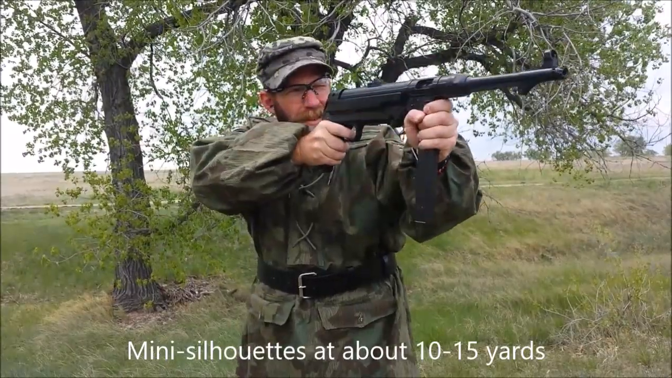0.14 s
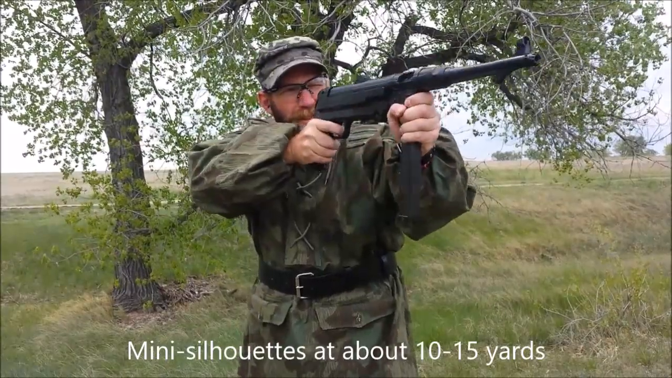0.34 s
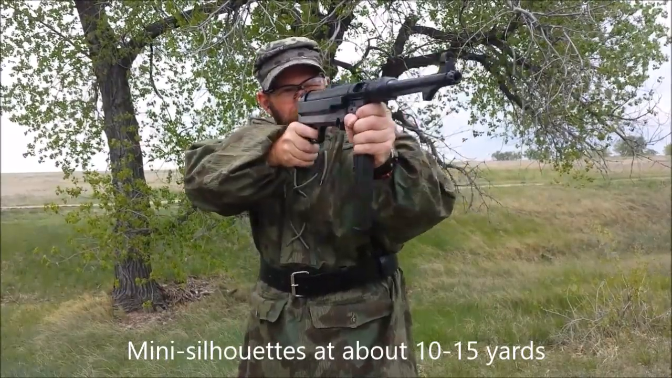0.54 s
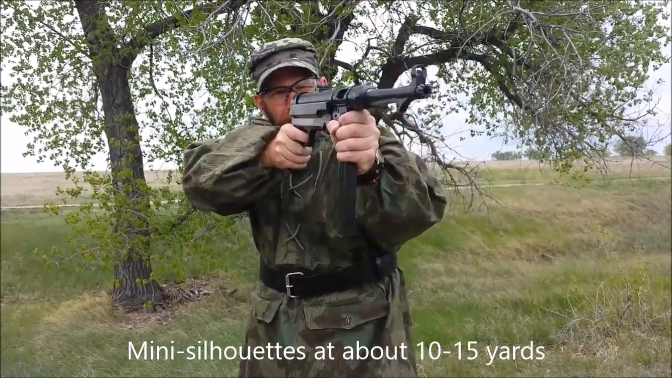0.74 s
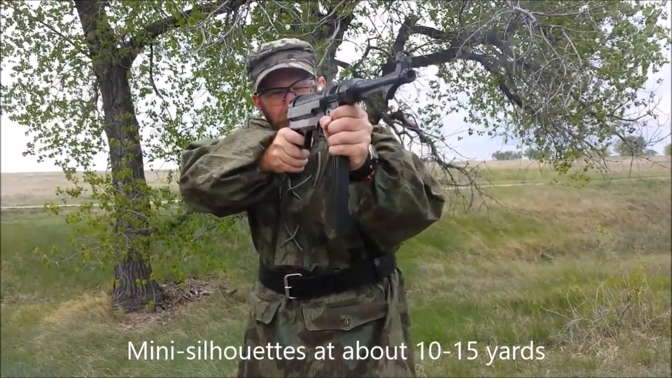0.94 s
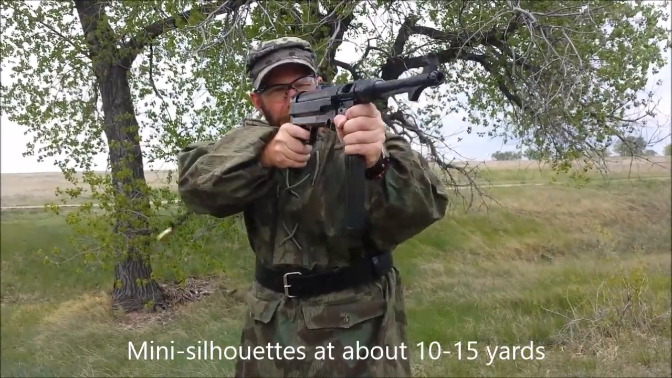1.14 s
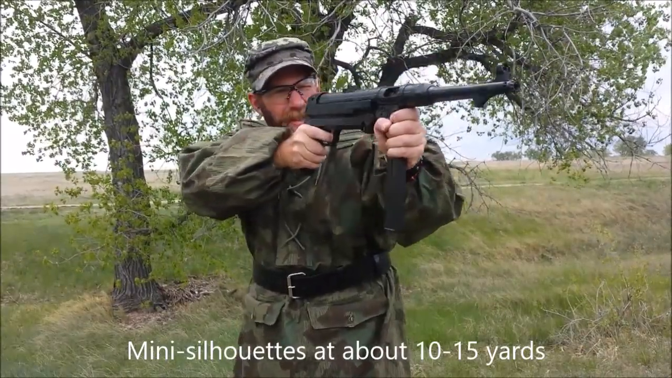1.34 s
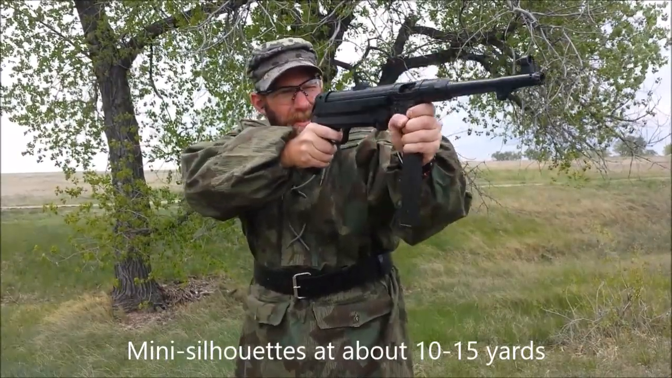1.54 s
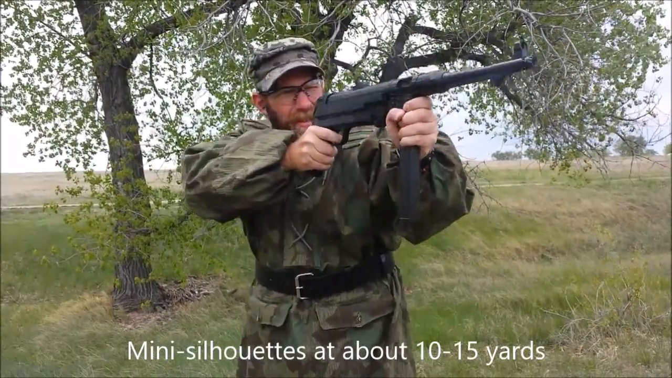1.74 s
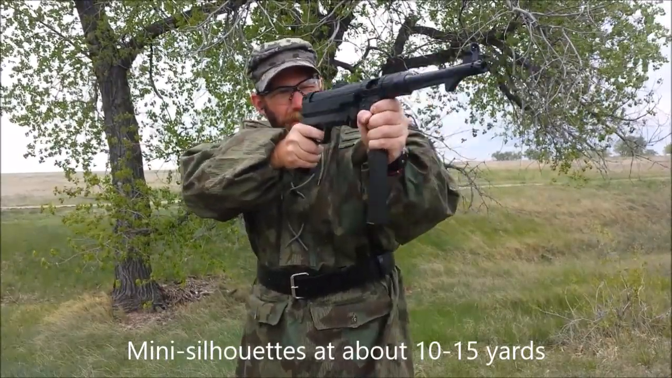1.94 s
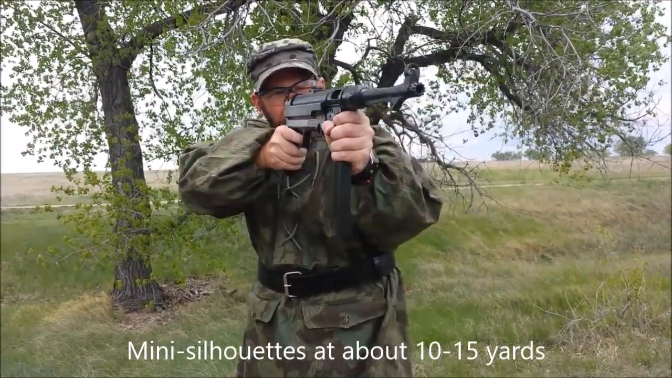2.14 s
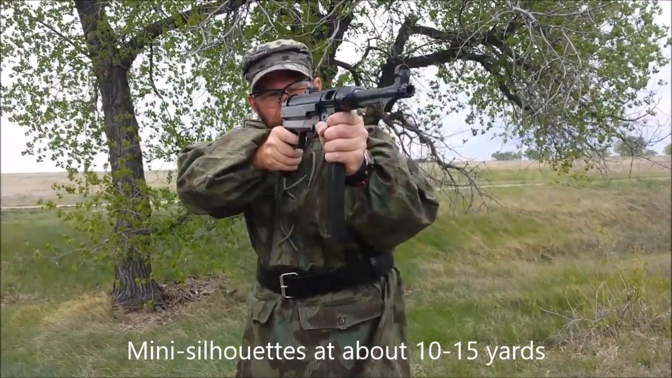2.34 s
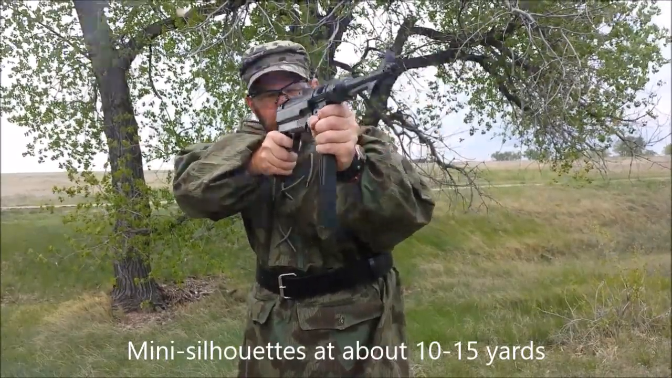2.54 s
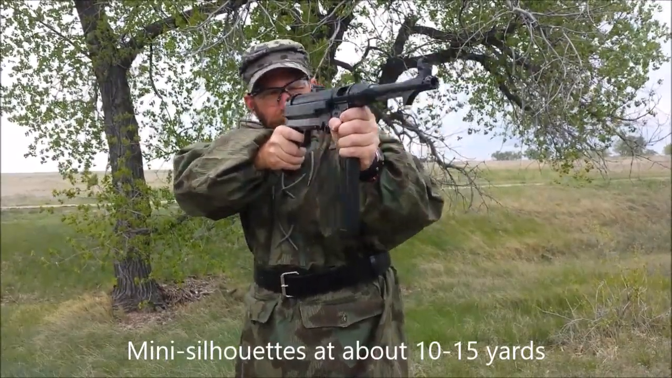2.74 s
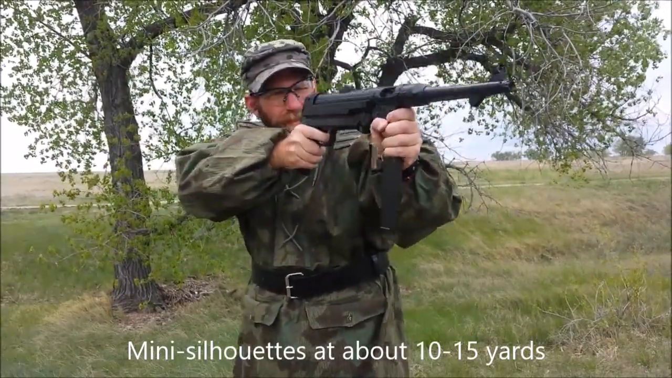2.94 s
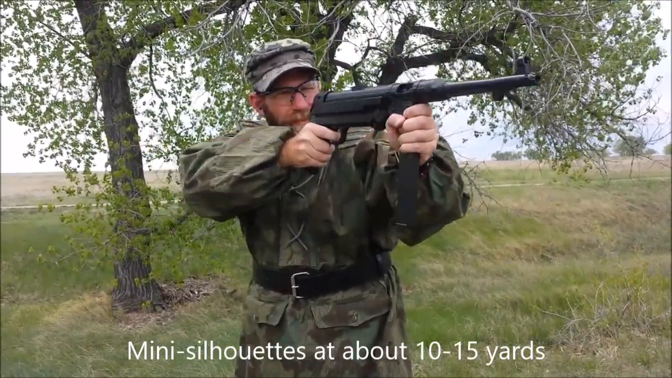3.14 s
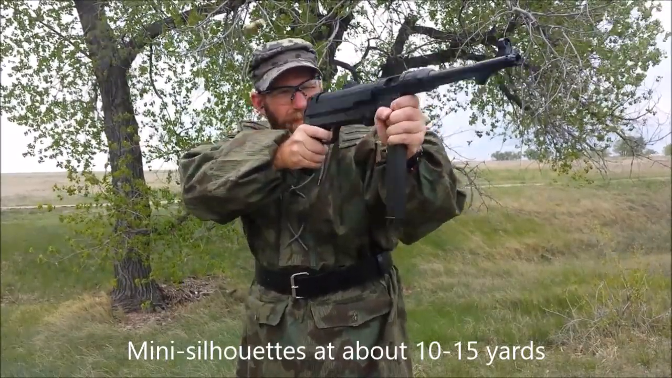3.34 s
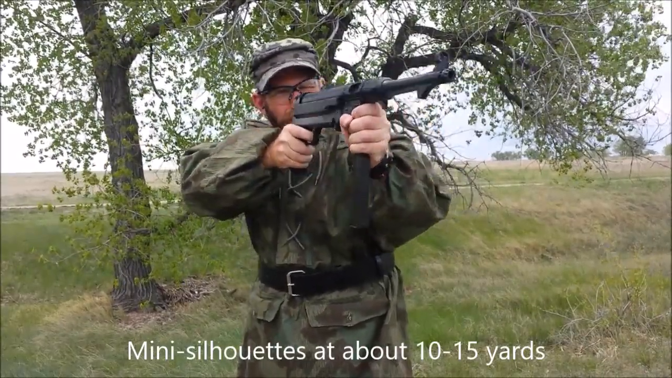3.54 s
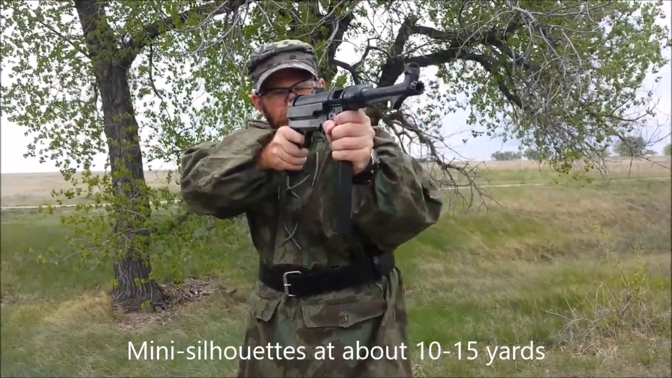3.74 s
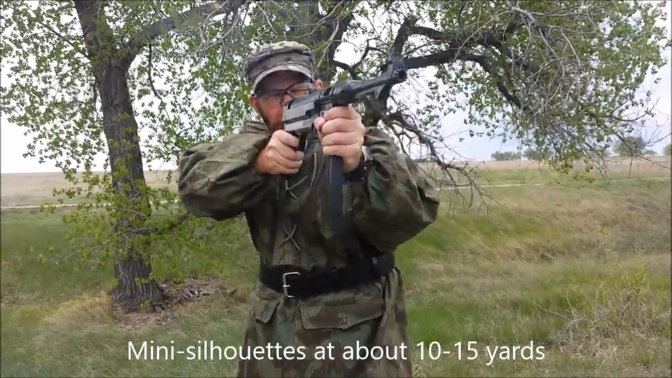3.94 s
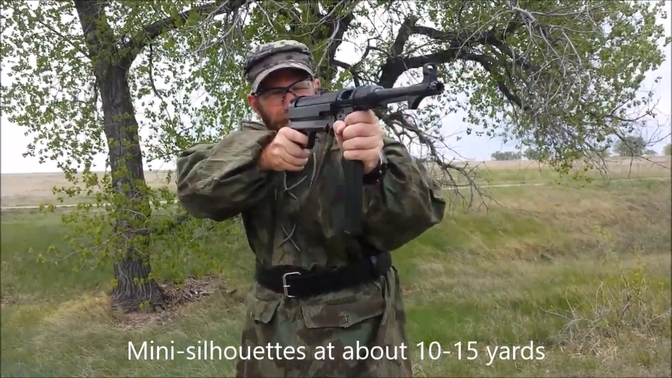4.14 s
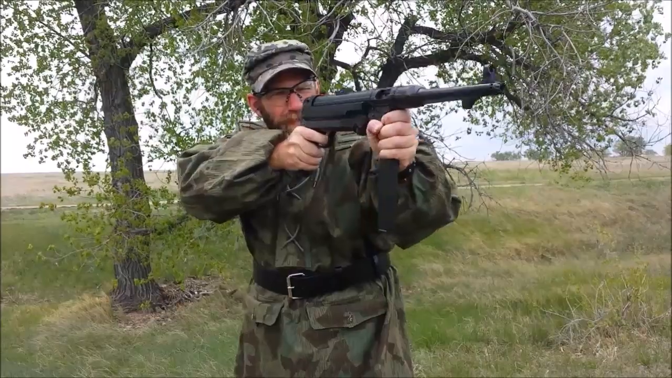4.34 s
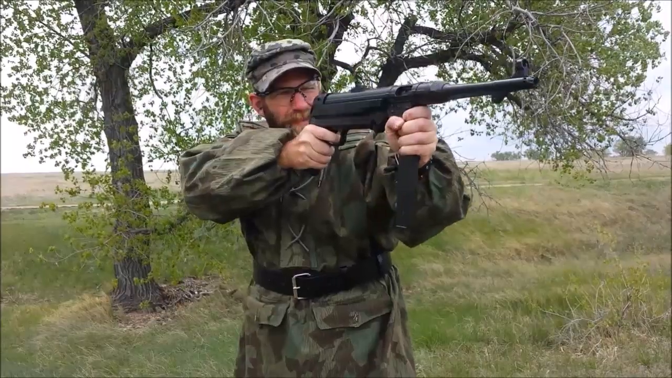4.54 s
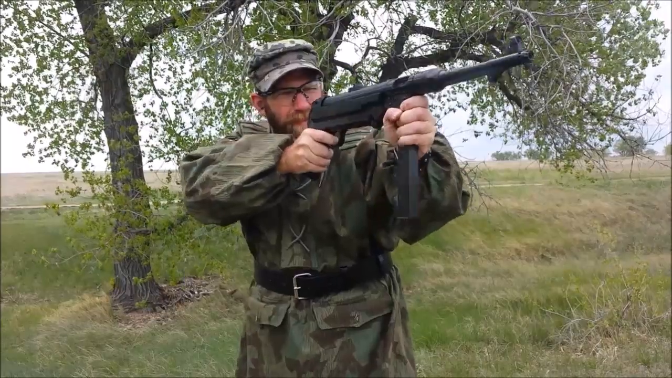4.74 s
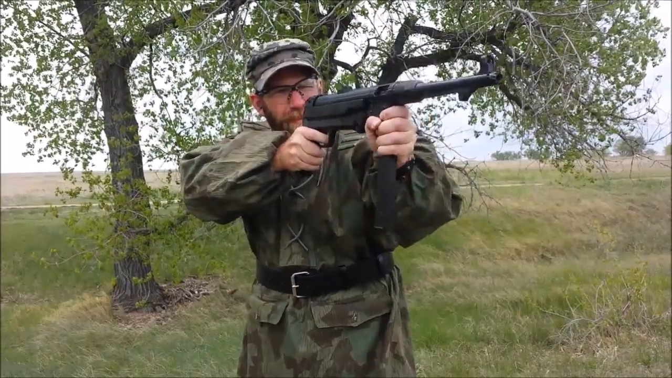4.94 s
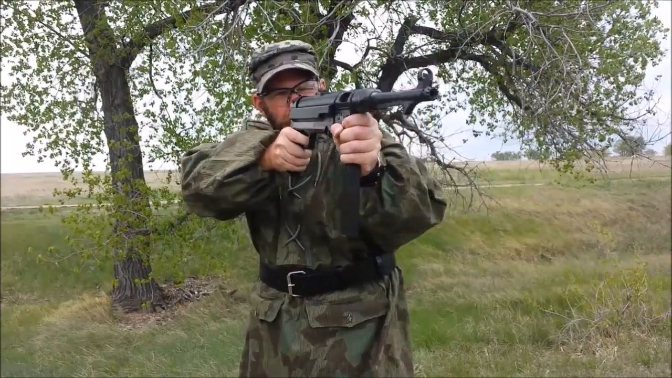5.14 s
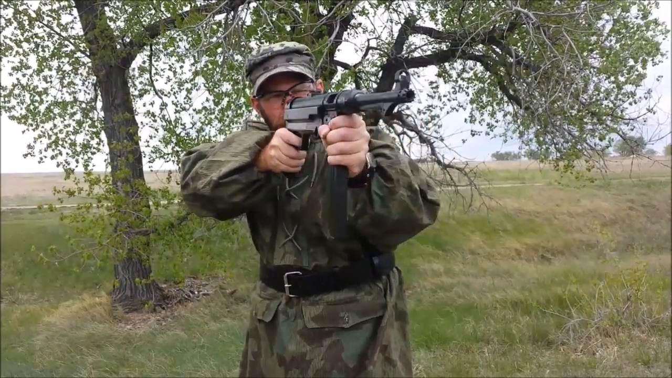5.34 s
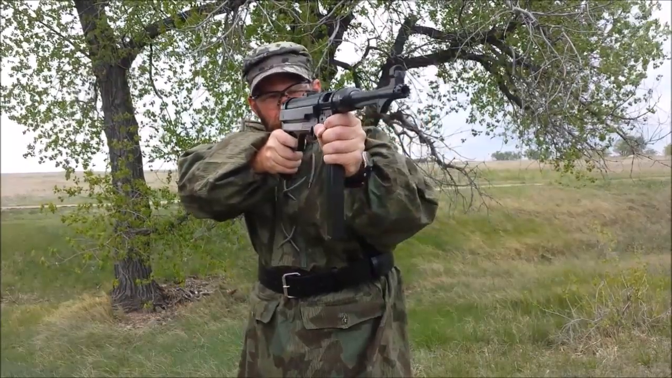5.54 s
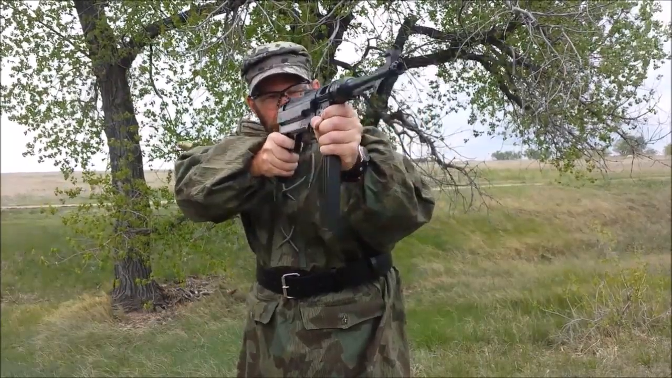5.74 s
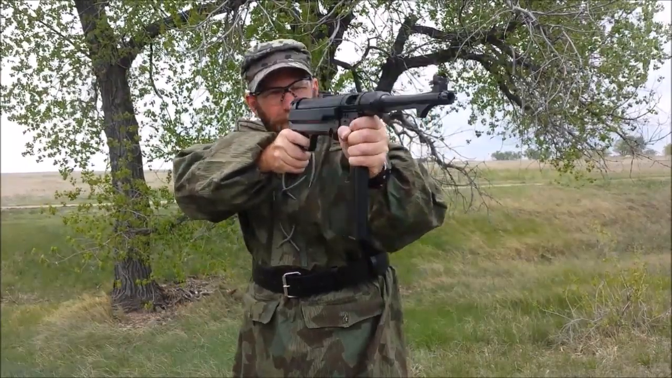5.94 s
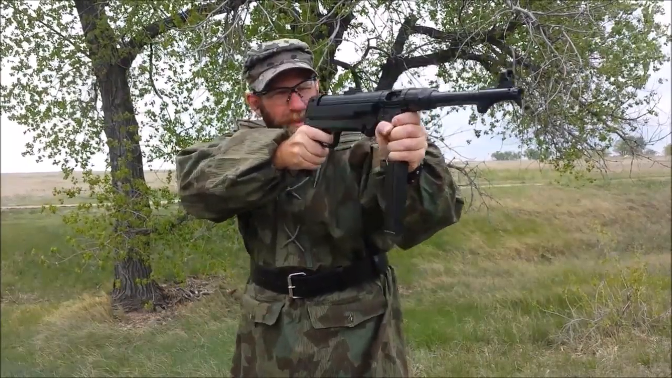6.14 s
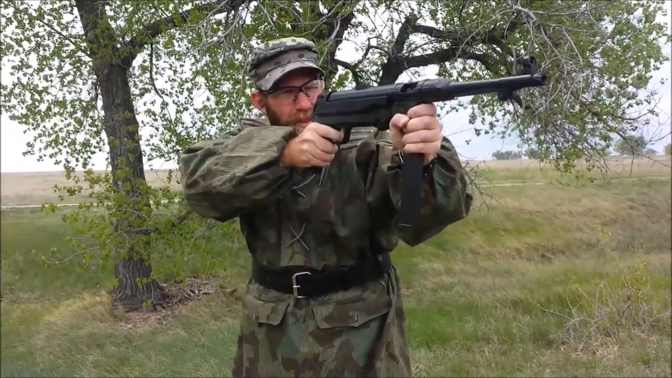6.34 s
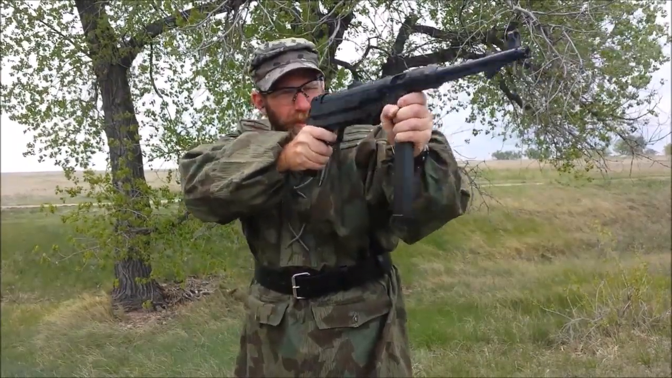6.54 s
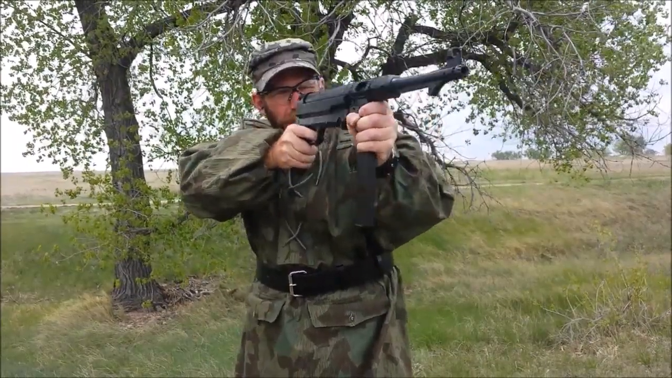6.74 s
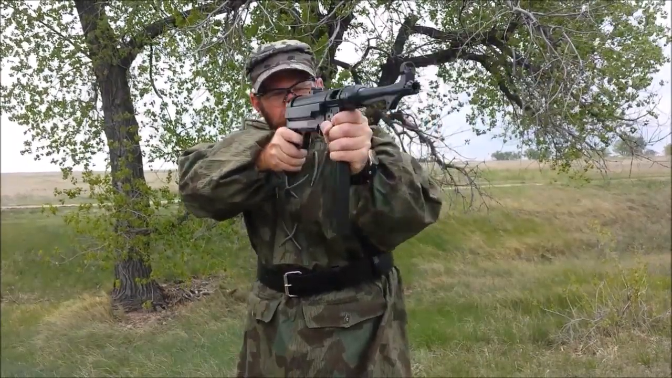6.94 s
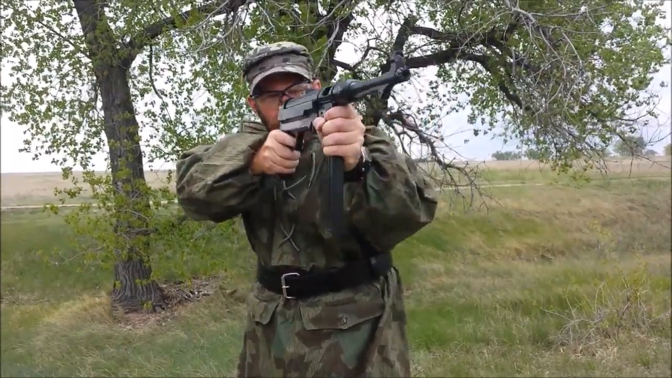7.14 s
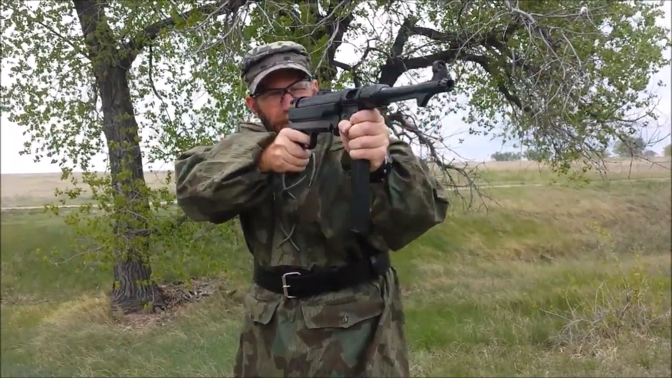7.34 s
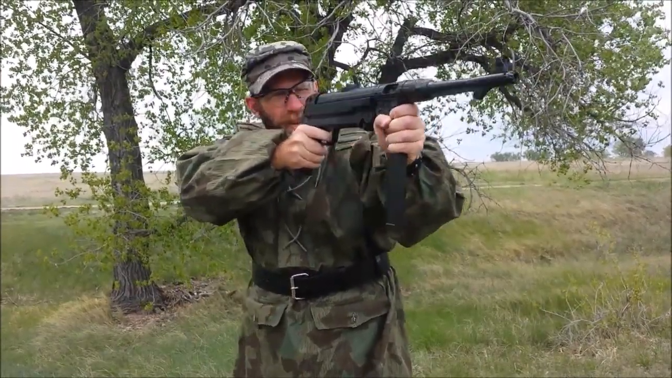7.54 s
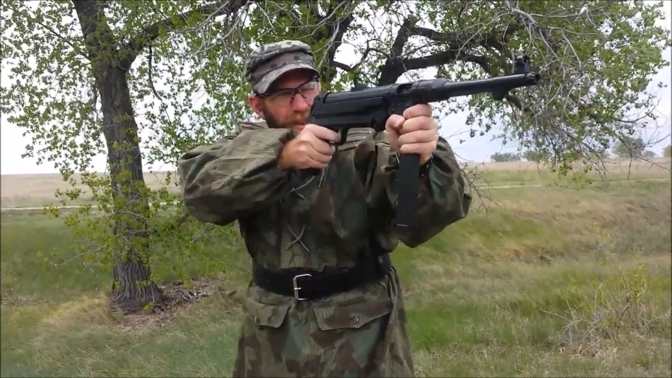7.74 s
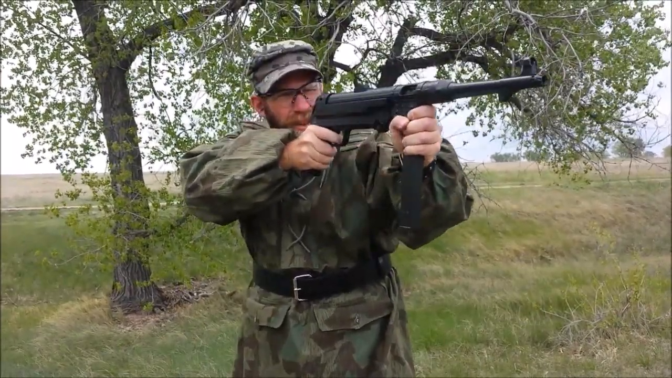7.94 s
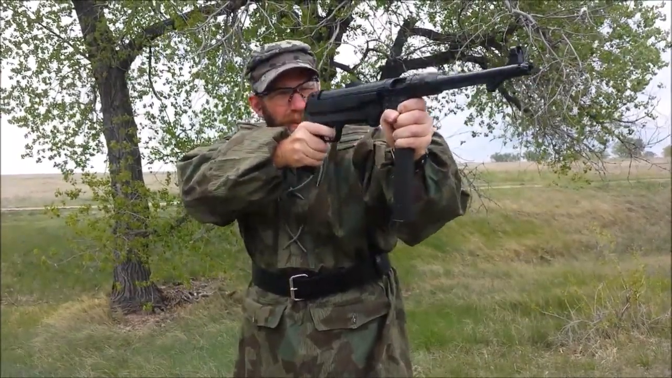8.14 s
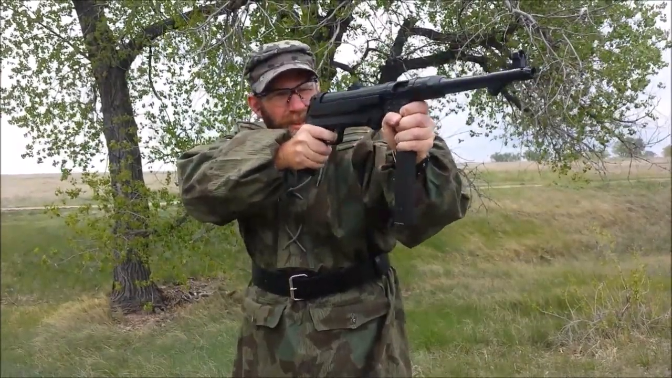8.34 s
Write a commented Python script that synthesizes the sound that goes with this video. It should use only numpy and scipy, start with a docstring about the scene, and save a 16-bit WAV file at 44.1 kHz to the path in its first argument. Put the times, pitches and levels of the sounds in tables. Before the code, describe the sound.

A semi-automatic gun fires single shots in an open field, overloading the microphone, with short scattered echoes and buffeting wind between them.

```python
"""Eleven single pistol shots crack across an open field a few metres away, loud enough to overload the microphones.
Each shot layers a trigger tick, a muzzle blast and the bolt slam in shaped noise, ringing modes for the steel
and a struck target, and a long noise tail scattered from grass and trees. Spent cases knock and ring now and then.
Gusts buffet the microphone ports, mostly the left one, as noise read faster in stronger air;
leaves rustle faintly and a thin whine wavers in the distance."""
import sys
import numpy as np
from scipy import signal
from scipy.fft import rfft, irfft
from scipy.io import wavfile
from scipy.ndimage import uniform_filter1d, map_coordinates

SR = 44100
rng = np.random.default_rng(int(sys.argv[2]) if len(sys.argv) > 2 else 0)


def transcribe(signal):
    """Save signal, clipped to [-1, 1], as a 16-bit WAV file at the path in sys.argv[1]."""
    frames = np.atleast_2d(signal).T
    limited = np.clip(frames, -1, 1)
    pcm = np.round(limited * 32767).astype(np.int16)
    wavfile.write(sys.argv[1], SR, pcm)


N = 373968
AGE = np.arange(SR) / SR  # time since an event began [s]
TIME = np.arange(N) / SR  # time in the scene [s]

# the shots: (time [s], trigger level [dB], blast level [dB], muzzle puff level [dB], bolt closing delay [s],
# bolt level [dB], steel ring level [dB], ring tilt [dB per octave], lower target mode level [dB],
# tree crown echo level [dB])
SHOTS = [(0.3014, -45.5, -3, -29.5, 0.032, 5, -2, 5, -27, 3),
         (1.0148, -41, -1.5, -12, 0.038, 3.5, -2, -14, -38, -3),
         (1.8053, -49.5, -3, -34, 0.031, 3, 2, -7.5, -36, -1.5),
         (2.5906, -55, -2, -11, 0.035, 5.5, 2.5, -17.5, -33, -2.5),
         (3.3251, -54, -1, -36.5, 0.034, 6, 0, -0.5, -21, 1.5),
         (3.9979, -54, -2, -11, 0.037, 4.5, 3, 0.5, -23.5, -1.5),
         (4.7477, -46.5, -2, -36, 0.038, 5, -12, -1, -38, 1),
         (5.763, -54, -2, -12, .037, 3.5, -5, -9, -39, -2),
         (6.544, -41.5, -3, -28, 0.032, 3.5, -0.5, -3, -42, 3.5),
         (7.1677, -66.5, -2.5, -8, 0.037, 5.5, -2, -9.5, -36, -4),
         (8.0655, -43, -2, -26, 0.034, 5, -4, 0, -38, 2.5)]
PUFF_DELAY_S = 0.026  # from the blast to the peak of its puff of gas at the ports


def undb(db):
    """Decibels to gain."""
    return 10 ** (np.asarray(db) / 20)


def pan(left_db):
    """Gains of the two channels for a left-minus-right level."""
    return undb(np.array([[left_db], [-left_db]]) / 2)


def noise(spectrum, size=SR, likeness=0.):
    """Two channels of coloured noise of rms 1; likeness is the share of power they have in common."""
    hz, db = np.transpose(spectrum)
    white = rng.standard_normal((3, size))
    share = np.clip(likeness, 0, 1)
    mixed = np.sqrt(1 - share) * white[:2] + np.sqrt(share) * white[2]
    bins_hz = np.fft.rfftfreq(size, 1 / SR)
    gain = undb(np.interp(np.log(bins_hz + 1), np.log(hz), db))
    coloured = irfft(rfft(mixed) * gain, size)
    return coloured / coloured.std()


def fade(start, rise, t60):
    """Envelope that swells towards its peak at start and then dies away by 60 dB in t60 (all in s)."""
    t = AGE - start
    return np.exp(np.minimum(t / rise, -np.log(1000) * t / t60))


def ring(hz, t60):
    """One struck mode, a dying sine; it reaches each microphone in its own random phase."""
    cycles = hz * AGE + rng.random((2, 1))
    return np.sin(2 * np.pi * cycles) * fade(.003, .001, t60)


def walk(rate, size=N):
    """A random wander of spread near 1 for each channel, from twice-smoothed steps at rate per second."""
    k = int(SR / rate)
    steps = np.repeat(rng.standard_normal((2, size // k + 1)), k, axis=1)
    return 1.3 * uniform_filter1d(uniform_filter1d(steps, k), k)[:, :size]


def swells(rows, rise, fall):
    """Gain over time of events (start, length, level) that each build up, hold and die away."""
    power = np.zeros(N)
    for start, length, db in rows:
        outside = np.maximum((start - TIME) / rise, (TIME - start - length) / fall)
        power += undb(db) ** 2 * np.exp(-2 * np.clip(outside, 0, 20))
    return np.sqrt(power)


def add(out, start, x):
    """Mix x into out from the given time on."""
    i = max(int(start * SR), 0)
    out[:, i:i + x.shape[1]] += x[:, :max(N - i, 0)]


def airflow():
    """Strength of the wind at each port: a wandering breeze, the gusts and the muzzle puffs, summed in power."""
    # gusts that reach the microphones: (start [s], length [s], level [dB])
    gust_rows = [(0.0, 0.11, -17), (0.15, 0.13, -14), (0.39, 0.11, -15), (0.585, 0.04, -22),
                 (0.8, 0.096, -23), (0.945, 0.19, -18), (1.235, 0.052, -13), (1.5, 0.27, -24),
                 (1.91, 0.09, -21), (2.02, 0.1, -16), (2.15, 0.073, -12), (2.26, 0.22, -25),
                 (2.68, 0.08, -17), (2.81, 0.1, -14.5), (2.99, 0.21, -13), (3.2, 0.11, -15.5),
                 (3.38, 0.14, -21), (3.665, 0.032, -20), (3.78, 0.06, -19.5), (4.08, 0.064, -19),
                 (4.19, 0.22, -16), (4.47, 0.046, -14), (4.685, 0.042, -18), (4.88, 0.068, -23),
                 (5.165, 0.073, -14.5), (5.42, 0.12, -13), (5.58, 0.16, -24), (6.18, 0.29, -15),
                 (6.71, 0.041, -19.5), (7.02, 0.091, -20), (7.13, 0.17, -17.5), (7.385, 0.14, -16),
                 (7.63, 0.08, -17.5), (7.87, 0.2, -15), (8.15, 0.24, -17), (8.43, 0.06, -10.5)]
    breeze_db = np.array([[-28.5], [-33]])  # left, right
    lee_db = -19  # the right port is sheltered from the gusts
    breeze = undb(breeze_db + 1.4 * walk(11))
    gusts = undb([[0], [lee_db]]) * swells(gust_rows, rise=.012, fall=.024)
    return np.sqrt(breeze ** 2 + gusts ** 2 + puffs() ** 2)


def puffs():
    """Gain of the gust that the muzzle gas sends to the ports just after each blast."""
    out = np.zeros((2, N))
    for s, _, _, puff_db, *_ in SHOTS:
        add(out, s, pan(4) * undb(puff_db) * fade(PUFF_DELAY_S, .012, .12))
    return out


def buffets(strength, width=0.00028, hard_tip=.00008, soft_tip=.00025):
    """Tight eddies strike the left port, each a single peak of pressure; the hardest are the most pointed."""
    # the hardest buffets: (time [s], level [dB])
    hard_rows = [(2.035, 2.5), (2.147, 7), (2.211, 7.5), (2.811, 6.5), (3.008, 1.5), (3.105, 4),
                 (4.492, 6.5), (4.695, -1.5), (5.169, -1), (5.474, 4), (6.283, -7), (6.32, -2), (6.367, 3),
                 (6.42, 1), (6.455, -4.5), (7.933, 2), (8.004, 6.5)]
    # the lesser ones come at random, more often and harder in stronger air
    top_rate_per_s, full_gust_db = 35, -14.5  # the rate levels off at this strength of air
    over_gust_db, scatter_db = 7.5, 4.5
    rate = top_rate_per_s * np.minimum(strength / undb(full_gust_db), 1) ** 2
    struck = rng.random(N) < rate / SR
    soft = struck * strength * undb(over_gust_db + scatter_db * rng.standard_normal(N))
    hard = np.zeros(N)
    for s, db in hard_rows:
        hard[int(s * SR)] = undb(db)
    half = SR // 50
    t = np.arange(-half, half) / SR
    peaks = np.zeros(N)
    for strikes, tip in ((soft, soft_tip), (hard, hard_tip)):
        peak = np.exp(-np.hypot(t, tip) / width)  # tip rounds the point
        peaks += signal.fftconvolve(strikes, peak, mode="same")
    return np.array([[1], [0]]) * peaks


def pushes():
    """Each puff also presses once on the ports and lets go: a soft thud."""
    out = np.zeros((2, N))
    u = (AGE - PUFF_DELAY_S) / 0.01
    for s, _, _, puff_db, *_ in SHOTS:
        add(out, s, pan(4) * undb(puff_db) * -2 * u * np.exp(-2 * u ** 2))
    return out


def wind(skew=0.21, flicker_db=2.0, flutter_db=2.5, octave_db=15):
    """Eddies drift over each port: a stronger gust carries them faster, so it is louder and brighter."""
    # eddy spectrum at a reading speed of 1: (frequency [Hz], level [dB])
    eddy_spectrum = [(20, -10), (110, 2.5), (200, -2.5), (400, -10.5), (600, -21), (1000, -33.5),
                     (2000, -50.5), (4000, -89.5)]
    strength = airflow()
    gust_db = 20 * np.log10(strength) + flicker_db * walk(70) + flutter_db * walk(300)
    # reading speed of the noise doubles for every octave_db of gust
    speed = 2 ** ((gust_db + np.array([[19.5], [25]])) / octave_db)
    eddies = noise(eddy_spectrum, size=2 ** 19)
    flow = np.array([map_coordinates(e, [np.cumsum(v)], order=1, mode="wrap") for e, v in zip(eddies, speed)])
    # a share of the squared flow sharpens the crests into spikes
    pressure = (flow + skew * (flow ** 2 - 1)) * undb(gust_db)
    total = pressure + buffets(strength[0]) + pushes()
    swing = signal.sosfilt(signal.butter(1, 80, "high", fs=SR, output="sos"), total)
    return 1.372 * np.tanh(swing / 1.27)  # the largest swings are rounded off


def leaves():
    """Leaves rustle faintly: broad noise whose level wanders gently."""
    # rustle spectrum: (frequency [Hz], level [dB])
    leaf_spectrum = [(100, 0.5), (900, -5), (1800, 2), (3100, -3.5), (4200, -10), (6300, -9.5),
                     (7700, -12.5), (9500, -19.5), (12000, -26), (15000, -44)]
    return pan(2) * undb(-59.5 + 1.2 * walk(6.7)) * noise(leaf_spectrum, size=N)


def tick(t60):
    """A small dry metal contact: a very short burst of noise."""
    # contact spectrum: (frequency [Hz], level [dB])
    tick_spectrum = [(500, 0), (2000, 8), (3200, 4), (4500, -4.5), (7000, -7.5), (10000, -24),
                     (14000, -20.5)]
    return noise(tick_spectrum, likeness=0.61) * fade(0.00073, .0005, t60)


def blast():
    """The shock front and roaring gas jet, the slower boom of the gas ball, and a slap back from the tree trunk."""
    # shock and jet spectrum: (frequency [Hz], level [dB])
    crack_spectrum = [(100, -25.5), (400, -3), (900, 3), (1550, 5), (3000, 0), (4500, 0.5), (7300, 3),
                      (10000, -5), (15000, -6.5)]
    # gas ball spectrum: (frequency [Hz], level [dB])
    boom_spectrum = [(60, -21), (200, -10), (330, -8), (430, 2.5), (540, -7), (640, -0.5), (780, -13.5),
                     (1020, -9.5), (1550, -6), (2500, -10.5), (5000, -33)]
    slap_spectrum = [(500, -6.5), (1500, 6), (4000, -9.5), (7000, -2.5), (15000, -3)]
    crack = undb(1.0) * noise(crack_spectrum, likeness=0.029) * fade(0.0018, 0.0011, 0.061)
    boom = undb(0.5) * noise(boom_spectrum, likeness=0.17) * fade(0.0069, 0.0039, 0.048)
    slap = undb(-10.5) * noise(slap_spectrum) * fade(0.014, 0.004, 0.11)
    return crack + boom + pan(1.6) * slap


def field(echo_db, imprint=0.38):
    """Scatter from grass and the near tree thins out past its edge; distant ground and tree crowns answer later."""
    # grass and near tree spectrum: (frequency [Hz], level [dB])
    near_spectrum = [(100, -19.5), (380, -2.5), (900, -5.5), (1500, -4), (2200, -0.5), (3200, -2),
                     (4200, -6.5), (6000, -3.5), (8000, -6), (9500, -12), (12000, -16.5), (15000, -28)]
    # distant ground spectrum: (frequency [Hz], level [dB])
    far_spectrum = [(200, -0.5), (700, -10), (1200, -8), (2000, 3), (3100, -1.5), (4200, -8.5), (7000, -8),
                    (9500, -28.5), (14000, -37.5)]
    # tree crown spectrum: (frequency [Hz], level [dB])
    crown_spectrum = [(1000, -3.5), (3000, -6.5), (4300, -3), (6300, 0), (7700, -6), (9500, -17.5),
                      (14000, -26.5)]
    edge = 1 / np.sqrt(1 + np.exp((AGE - .2) / 0.022))
    lumpy = undb(1.8 * walk(130, size=SR))
    near = undb(-12.0) * noise(near_spectrum, likeness=0.13) * fade(0.01, 0.0019, 0.81) * edge * lumpy
    far = undb(-32.5) * noise(far_spectrum) * fade(0.14, 0.078, 0.86)
    crowns = undb(-43.5) * noise(crown_spectrum) * fade(.372, 0.018, 0.34)
    # near reflections repeat the same ragged burst of gas, which gives each shot's tail its own colour
    burst = (rng.standard_normal(SR) * fade(0, .001, 0.082))[:SR // 40]
    coloured = signal.fftconvolve(near, burst[None] / np.linalg.norm(burst))[:, :SR]
    scatter = (near + imprint * coloured) / np.hypot(1, imprint)
    return scatter + far + pan(4.5) * undb(echo_db) * crowns


def bolt():
    """The bolt scrapes a round out of the magazine, then slams it home."""
    # bolt spectrum: (frequency [Hz], level [dB])
    bolt_spectrum = [(100, -13.5), (400, 0), (900, 0.5), (2000, -2.5), (3200, -0.5), (4400, -3.5),
                     (6000, 2.5), (8000, 0), (10000, -2.5), (15000, -7.5)]
    scrape = undb(-12.0) * noise(bolt_spectrum, likeness=0.11) * fade(0.00092, .003, 0.075)
    slam = undb(-14.5) * noise(bolt_spectrum, likeness=0.16) * fade(0.01, 0.0026, 0.11)
    return pan(2.2) * (scrape + slam)


def steel(tilt_db, level_db=-1):
    """The bolt and receiver ring, each blow sharing its force differently among the modes."""
    # modes of the ringing steel: (frequency [Hz], level [dB], t60 [s])
    mode_rows = [(3801, -23, .22), (4780, -30, .15), (5590, -16, .16), (5830, -20, .24), (6100, -19, .2),
                 (6930, -18.5, .2), (7470, -24, .16), (7720, -27, .15), (8310, -22, .22), (8630, -26, .16),
                 (9090, -27, .16), (10400, -30, .14)]
    scatter_db = 2 * rng.standard_normal((len(mode_rows), 2, 1))
    modes = np.zeros((2, SR))
    for (hz, db, t60), blow_db in zip(mode_rows, scatter_db):
        tilted_db = db + blow_db + tilt_db * np.log2(hz / 6000)
        modes += undb(tilted_db) * ring(hz, t60)
    return pan(1.5) * undb(level_db) * modes


def target(ring_db, upper_db=-37):
    """The bullet smacks into a small steel plate, which rings in two modes whose levels vary from hit to hit."""
    # impact spectrum: (frequency [Hz], level [dB])
    smack_spectrum = [(150, -5.5), (450, 6), (800, -5), (1300, -1.5), (2500, 0.5), (5000, -20.5),
                      (12000, -35)]
    smack = undb(-17.5) * noise(smack_spectrum, likeness=0.47) * fade(0.0017, 0.0023, 0.082)
    lower = undb(ring_db) * ring(2040, 0.35)
    upper = undb(upper_db + 3 * rng.standard_normal()) * ring(3150, 0.5)
    return smack + lower + upper


def pistol():
    """Every shot runs through the same cycle: trigger, blast and its echoes, bolt and steel, target."""
    trigger_lead_s, target_delay_s = .031, 0.09  # before and after the blast
    out = np.zeros((2, N))
    for s, trigger_db, blast_db, _, closes, bolt_db, ring_db, tilt_db, target_db, echo_db in SHOTS:
        add(out, s - trigger_lead_s, undb(trigger_db) * tick(0.037))
        add(out, s, pan(.1) * undb(blast_db) * (blast() + field(echo_db)))
        add(out, s + closes, undb(bolt_db) * bolt() + undb(ring_db) * steel(tilt_db))
        add(out, s + target_delay_s, target(target_db))
    return out


def whine():
    """A thin whine in the distance: a sine that wavers slightly in pitch and level and comes in spells."""
    # spells of whine: (start [s], length [s], level [dB])
    spells = [(0.4, 0.7, -61.5), (2.2, 0.85, -60.5), (3.5, 0.45, -57.5), (4.9, 0.5, -66)]
    phase = 2 * np.pi * np.cumsum(1680 + 3 * walk(23)[0]) / SR
    return swells(spells, rise=.12, fall=.12) * undb(1.5 * walk(13)) * np.sin(phase)


def cases():
    """Brass cases knock on the ground, bounce once and ring thinly in a beating pair of modes."""
    # landings: (time [s], knock level [dB], bounce delay [s], ring frequency [Hz], ring level [dB])
    landings = [(2.287, -39, 0.01, 11520, -84), (2.959, -41.5, .003, 11900, -74.5),
                (3.691, -28.5, 0.016, 12100, -61.5), (5.331, -35, 0.0071, 10800, -59),
                (7.494, -62, 0.019, 11600, -72)]
    out = np.zeros((2, N))
    for s, knock_db, bounce, hz, ring_db in landings:
        pair = ring(hz, .4) + undb(-5.0) * ring(hz + 45, .4)
        add(out, s, undb(knock_db) * tick(0.063) + undb(ring_db) * pair)
        add(out, s + bounce, undb(knock_db - 6) * tick(0.063))
    return pan(-0.5) * out


def scene():
    """Wind, leaves, gun, whine and cases together."""
    return wind() + leaves() + pistol() + whine() + cases()


def record(dry, port_hz=6100, port_q=3, port_lift=0.8, top_hz=15500):
    """The left port resonates in the treble; then the deepest rumble is thinned, peaks clip and the top is cut."""
    port = signal.lfilter(*signal.iirpeak(port_hz, port_q, fs=SR), dry)
    heard = dry + np.array([[port_lift], [0]]) * port
    thinned = signal.sosfilt(signal.butter(2, 36, "high", fs=SR, output="sos"), heard)
    clipped = np.clip(thinned, -.95, .95)  # hard overload
    return signal.sosfiltfilt(signal.ellip(8, .05, 50, top_hz, fs=SR, output="sos"), clipped)


dry = scene()
out = record(dry)
transcribe(out)
```